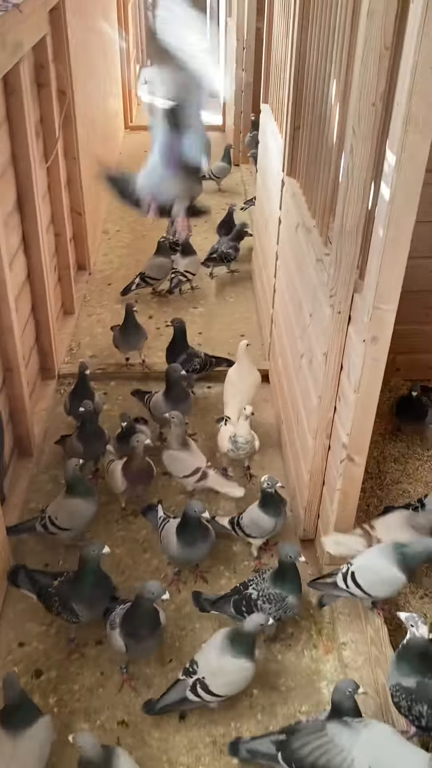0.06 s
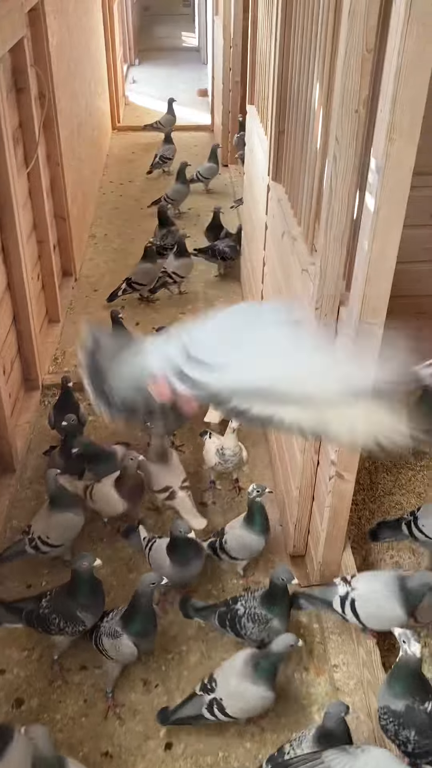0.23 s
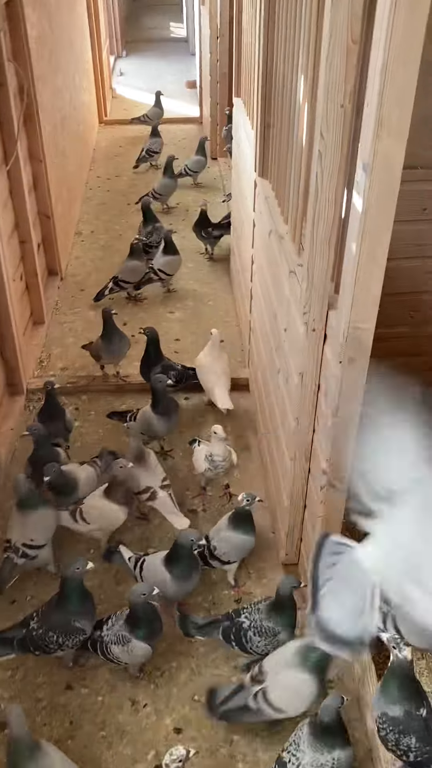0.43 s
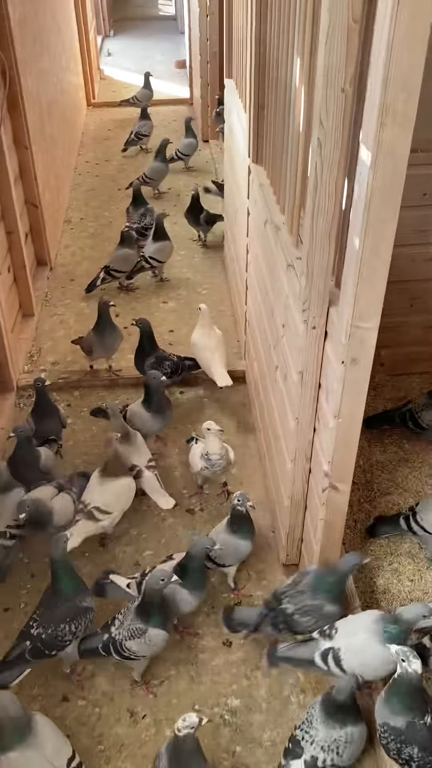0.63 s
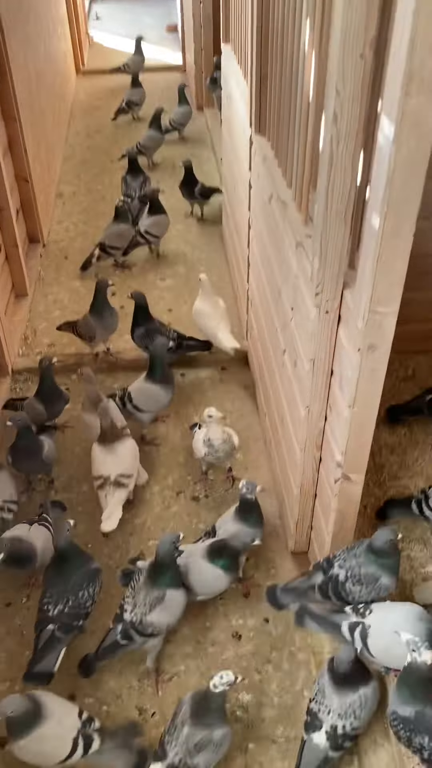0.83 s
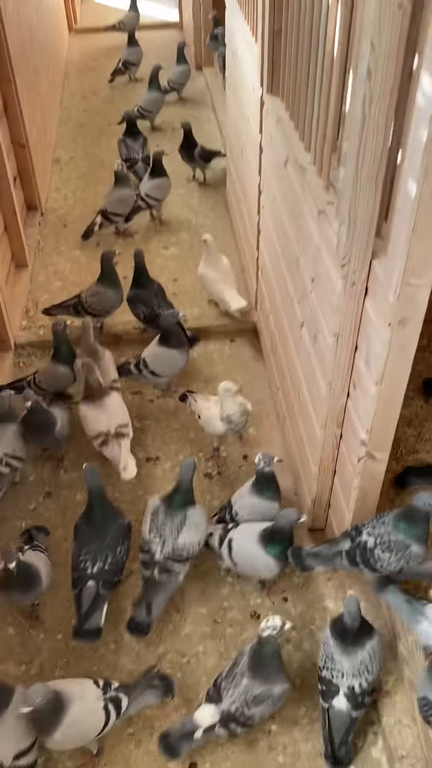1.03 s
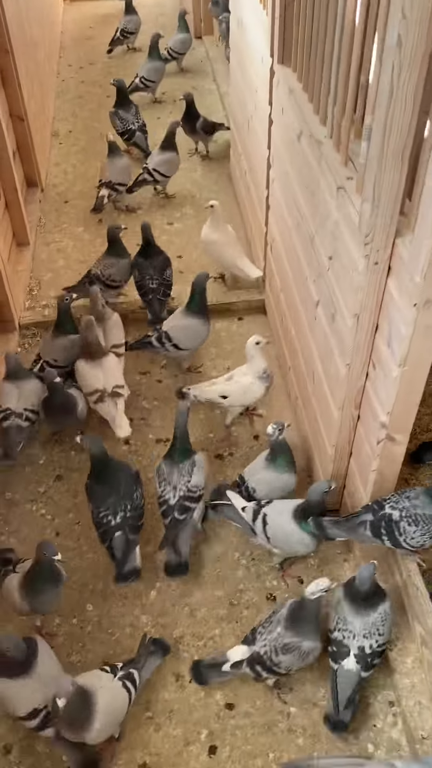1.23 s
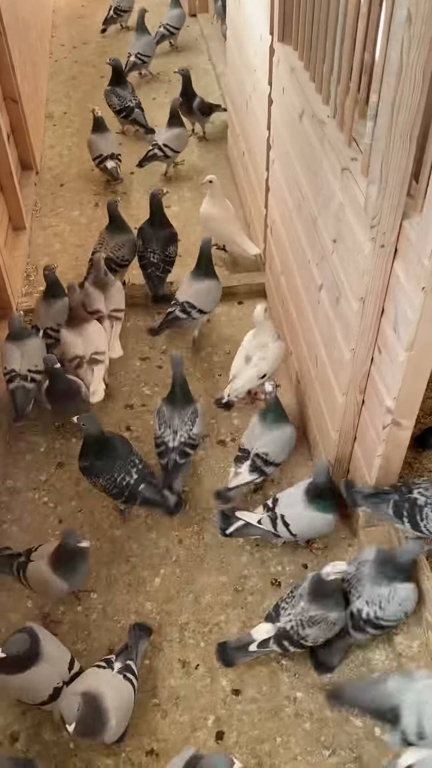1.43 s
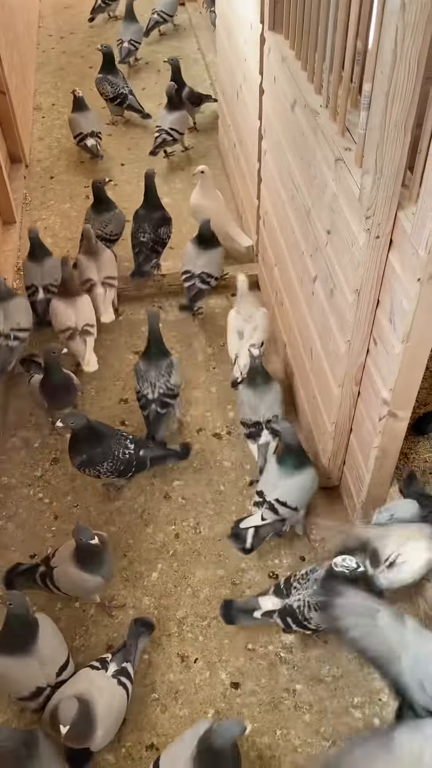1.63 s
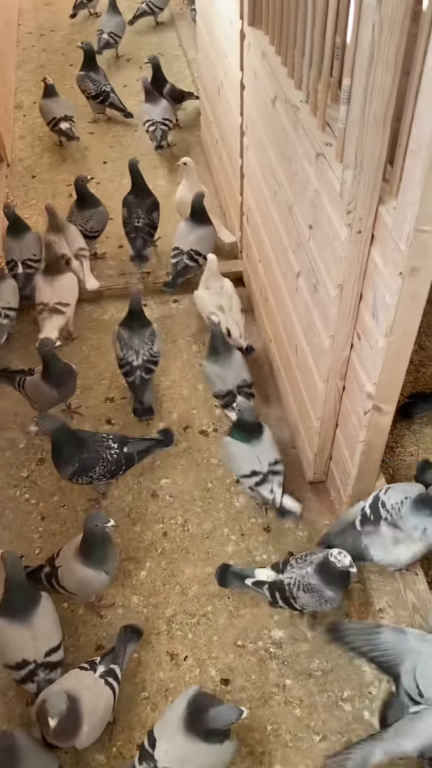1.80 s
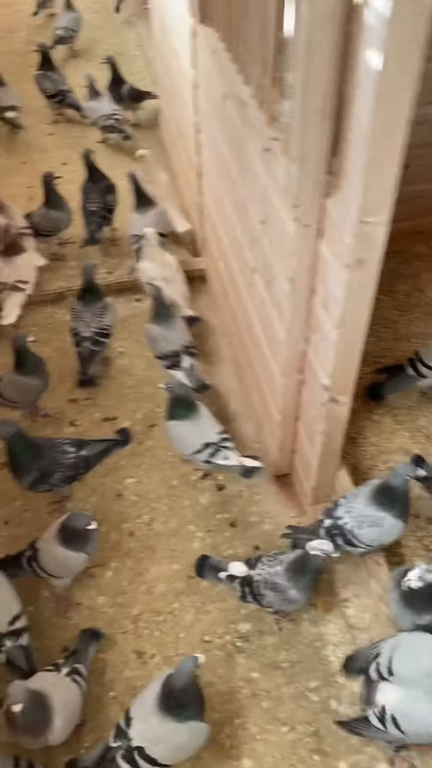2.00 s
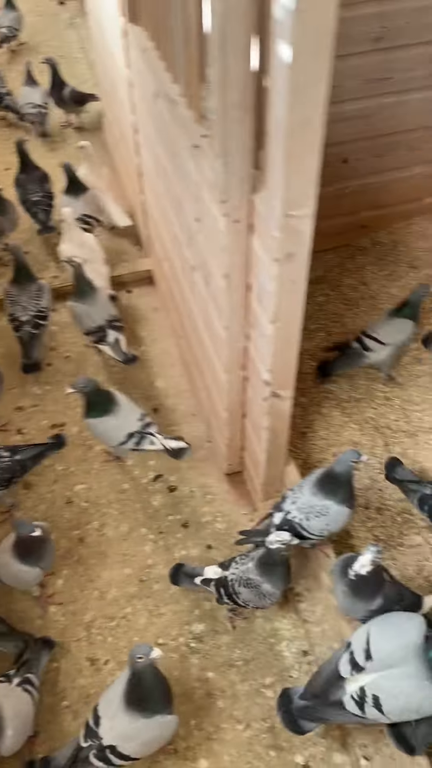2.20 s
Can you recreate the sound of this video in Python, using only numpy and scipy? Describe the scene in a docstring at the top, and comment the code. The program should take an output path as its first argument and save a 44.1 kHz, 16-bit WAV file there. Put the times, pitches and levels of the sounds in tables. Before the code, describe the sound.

Pigeon wings beat quickly at first with a brief high hiss on the right, then thin out among patter, sharp clicks and soft thumps; close stereo microphones in a short, dry plank room.

```python
"""Pigeons in a narrow wooden loft

Uneven wing strokes are puffs of coloured noise; claws and grit snap (wide noise) and tick (short modes).
Bodies thump on the boards as gliding low sines, and a high banded hiss leans right near the start.
Behind them boards boom and feathers rustle in shaped noise, with patter and rung plank modes.
Scattered echoes follow strokes, snaps, ticks and hiss."""
import sys
import numpy as np
from scipy import signal
from scipy.fft import rfft, irfft
from scipy.io import wavfile
from scipy.ndimage import uniform_filter1d, map_coordinates

SR = 44100
rng = np.random.default_rng(int(sys.argv[2]) if len(sys.argv) > 2 else 0)


def log_audio(samples):
    """Write samples as a 16-bit WAV file to the path given in sys.argv[1]."""
    # one column per channel
    frames = np.atleast_2d(samples).T
    # limit to full scale, then quantise
    limited = np.clip(frames, -1, 1)
    pcm = np.round(limited * 32767).astype(np.int16)
    wavfile.write(sys.argv[1], SR, pcm)


def amplitude_ratio(level_db):
    """Convert a level in decibels to the matching linear amplitude (field) ratio."""
    exponent = np.asarray(level_db, float) / 20
    return 10 ** exponent


N = 99445


def evened(x):
    """Scales to rms 1."""
    return x / np.sqrt(np.mean(x ** 2) + 1e-20)


def smooth_noise(count, width):
    """Slow random curve of rms 1: white noise under a moving average."""
    return evened(uniform_filter1d(rng.standard_normal(count), size=width))


def read(points, hz, axis=1):
    """Interpolates one column of a table on a log-frequency axis."""
    table = np.array(points, float)
    return np.interp(np.log(hz + 1), np.log(table[:, 0] + 1), table[:, axis])


def colour(x, gain):
    """Filters by a gain given as a function of frequency."""
    return irfft(rfft(x) * gain(np.fft.rfftfreq(x.shape[-1], 1 / SR)), x.shape[-1])


def bell(hz, centre_hz, octaves):
    """Gaussian hump on a log-frequency axis."""
    return np.exp(-(np.log2((hz + 1) / centre_hz) / octaves) ** 2)


def add(mix, start_s, sound):
    """Lays a two-channel sound into the mix."""
    part = mix[:, round(start_s * SR):][:, :sound.shape[1]]
    part += sound[:, :part.shape[1]]


def play(table, source):
    """Sounds every row of a table at its start time."""
    mix = np.zeros((2, N))
    for start_s, *row in table:
        add(mix, start_s, source(*row))
    return mix


# Each row: start in seconds, level in dB, length in seconds, tilt in dB per octave, hump in Hz.
WING_STROKES = [(.0, -38, 0.023, -6, 1100), (.068, -26.5, 0.023, -3.5, 1710), (.1, -37, 0.038, -5.5, 700),
                (.193, -37.5, 0.013, -7.5, 800), (.224, -35, 0.021, -6, 760), (.333, -35.5, 0.046, -7, 990),
                (.465, -37.5, 0.012, -11, 1000), (.512, -43.5, 0.013, -4, 810), (.558, -38, 0.016, -6, 740),
                (.584, -35.5, 0.012, -8, 720), (.693, -35, 0.023, -2, 990), (.725, -35.5, 0.0094, -11, 900),
                (.905, -44, 0.017, -8, 840), (1.075, -39.5, 0.012, -5.5, 1490),
                (1.121, -36, 0.016, -11, 1100), (1.149, -38, 0.02, -21, 950),
                (1.23, -44, 0.037, -4.5, 1000), (1.258, -41, 0.019, -6.5, 1450),
                (1.277, -48, 0.0098, -13, 1000), (1.455, -35, 0.019, -10, 700),
                (1.55, -38, 0.033, 0.5, 900), (1.572, -40.5, 0.039, -9, 900), (1.61, -43, .02, -9, 800),
                (1.65, -41, 0.033, -5, 700), (1.703, -47, 0.013, -8, 1200), (1.94, -38.5, 0.03, -17, 596),
                (2.03, -38, 0.014, -15, 900), (2.099, -35, 0.018, -6, 700)]


def wing_strokes():
    """Wings push puffs of air at uneven intervals."""
    return play(WING_STROKES, stroke)


STROKE_RISE_S, STROKE_LOW_HZ, QUILL_DB = 0.0047, 497, 1.5
STROKE_HUMP_DB, STROKE_HUMP_OCTAVES = 4.5, 0.5


def stroke(level_db, length_s, tilt_db_per_octave, hump_hz):
    """A puff of air with a broad hump in its colour and quills brushing unevenly through it."""
    t = np.arange(6000) / SR

    def gain(hz):
        tilt_db = tilt_db_per_octave * np.log2(hz / 1000 + 0.013)
        hump_db = STROKE_HUMP_DB * bell(hz, hump_hz, STROKE_HUMP_OCTAVES)
        return amplitude_ratio(tilt_db + hump_db) / (1 + (STROKE_LOW_HZ / (hz + 1)) ** 4)

    air = evened(colour(rng.standard_normal((2, len(t))), gain))
    shape = np.minimum(t / STROKE_RISE_S, 1) * np.exp(-(t / length_s) ** 2)
    quills_db = QUILL_DB * smooth_noise(len(t), 90)
    return air * shape * amplitude_ratio(level_db + quills_db)


# Each row: start in seconds, level in dB, centre in Hz, t60 in seconds.
FEATHER_CLAW_SNAPS = [(.0695, -34, 4030, 0.04), (.286, -37, 6860, 0.029), (.3601, -34.5, 8000, 0.039),
                      (.4085, -32, 4900, 0.029), (.549, -44, 4200, 0.025), (.7045, -24.5, 9000, 0.031),
                      (.7806, -40, 8000, 0.061), (.887, -41, 5500, 0.047), (.905, -31.5, 7550, 0.061),
                      (.966, -38, 6000, 0.046), (1.075, -38.5, 6000, 0.063), (1.151, -38, 6000, 0.033),
                      (1.335, -33.5, 6160, 0.038), (1.545, -38.5, 5270, 0.13), (1.706, -39.5, 9100, 0.043),
                      (1.833, -29, 7000, 0.026), (1.861, -37, 5040, 0.051), (1.9038, -37.5, 6930, 0.059),
                      (1.9384, -47, 6940, 0.041), (2.0995, -28, 9000, 0.035)]


def snaps():
    """Feathers and claws snap, wide in pitch and short."""
    return play(FEATHER_CLAW_SNAPS, snap)


SNAP_OCTAVES, SNAP_RISE_S, SNAP_GRAIN_DB = 1.7, 0.0031, 5


def snap(level_db, centre_hz, t60_s):
    """A short burst of wide, grainy noise with an exponential decay."""
    t = np.arange(2048) / SR
    air = rng.standard_normal((2, len(t)))
    air = evened(colour(air, lambda hz: bell(hz, centre_hz, SNAP_OCTAVES)))
    grain_db = SNAP_GRAIN_DB * smooth_noise(len(t), 40)
    return air * amplitude_ratio(level_db + grain_db - 60 * t / t60_s) * np.minimum(t / SNAP_RISE_S, 1)


# Each row: start in seconds, level in dB, pitch in Hz, t60 in seconds, offset of the side modes in dB.
CLAW_TICKS = [(.549, -15, 3950, 0.0062, -20), (.59, -31, 3650, 0.007, -14),
              (1.3165, -20, 4500, 0.0056, -15), (1.371, -28.5, 2570, 0.0071, -2),
              (1.4515, -15.5, 2326, 0.016, -12), (1.8125, -27, 3900, 0.0082, -19),
              (1.834, -28, 3850, 0.011, -16), (2.153, -22.5, 3350, 0.0094, -2.5),
              (2.165, -31, 3410, 0.026, -14)]


def ticks():
    """Claws or beaks tick on wood and grit."""
    return play(CLAW_TICKS, tick)


TICK_SCRATCH_DB, TICK_SIDE_DB, TICK_RISE_S = -11.5, -5, 0.0016
# Each row: multiple of the pitch, level in dB.
TICK_SIDE_MODES = [(.62, -4.5), (1.47, 5), (1.98, -3)]


def tick(level_db, pitch_hz, t60_s, others_db):
    """A few short modes of a small hard thing, higher ones dying sooner, with a scratch of noise."""
    t = np.arange(3000) / SR
    phase = rng.random((2, 1)) * 2 * np.pi
    modes = [(1, 0)] + [(k, db + others_db) for k, db in TICK_SIDE_MODES]
    ring = np.zeros((2, len(t)))
    for k, mode_db in modes:
        decay = amplitude_ratio(mode_db - 60 * t * np.sqrt(k) / t60_s)
        ring += decay * np.sin(2 * np.pi * pitch_hz * k * t + phase)
    ring *= amplitude_ratio([[0], [TICK_SIDE_DB]])
    scratch = amplitude_ratio(TICK_SCRATCH_DB - 60 * t / t60_s) * rng.standard_normal((2, len(t)))
    return (ring + scratch) * amplitude_ratio(level_db) * np.minimum(t / TICK_RISE_S, 1)


# Each row: start in seconds, level in dB, pitch in Hz, length in seconds.
BOARD_THUMPS = [(.0, -27.5, 134, 0.021), (.1, -30, 339, 0.041), (.15, -30, 78.6, .05),
                (.22, -29.5, 264, 0.018), (.345, -29.5, 55, 0.052), (.47, -34.5, 55, 0.043),
                (.595, -31.5, 52, 0.042), (.715, -33, 109, .03), (1.11, -35.5, 350, 0.024),
                (1.485, -28.5, 145, 0.033), (1.49, -33, 260, .04), (1.505, -22.5, 125, 0.041),
                (1.535, -29.5, 184, 0.065), (1.575, -26.5, 88, .03), (1.6, -34, 340, .03),
                (1.605, -28.5, 73, 0.036), (1.645, -30, 110, 0.055), (1.68, -33, 160, .05),
                (1.86, -34, 155, 0.037), (1.915, -31.5, 62, 0.06), (1.955, -26, 189, 0.034),
                (2.155, -25, 210, 0.032), (2.225, -31, 380, .025), (2.227, -25, 175, 0.03)]


def thumps():
    """Feet and bodies land on the boards."""
    return play(BOARD_THUMPS, thump)


THUMP_GLIDE, THUMP_WOBBLE = 0.12, 0.05  # shares of the pitch: total rise, rms


def thump(level_db, pitch_hz, length_s):
    """A board swings unevenly, swelling and dying under a half-sine."""
    t = np.arange(4096) / SR
    noise = uniform_filter1d(rng.standard_normal(len(t)), size=150)
    wobble = evened(uniform_filter1d(noise, size=150))
    part = np.minimum(t / length_s, 1)
    pitch = pitch_hz * (1 + THUMP_GLIDE * (part - 0.5) + THUMP_WOBBLE * wobble)
    turns = np.cumsum(pitch) / SR + rng.random()
    return np.ones((2, 1)) * amplitude_ratio(level_db) * np.sin(np.pi * part) * np.sin(2 * np.pi * turns)


HISS_FROM_S, HISS_TO_S, HISS_DB, HISS_FADE_DB = 0.022, 0.25, -39, -6
HISS_ROUGH_DB, HISS_SIDE_DB = 2.5, -8
HISS_SAG = 0.0152  # bands start this share high and end this share low
# Each row: centre in Hz, half width in Hz, level in dB.
HISS_BANDS = [(3850, 380, -1), (4420, 270, -0.5), (5660, 360, -5)]


def hiss():
    """Noise in narrow high bands that sink a little, throbbing, from the right."""
    t, length_s = np.arange(SR // 2) / SR, HISS_TO_S - HISS_FROM_S

    def gain(hz):
        return sum(amplitude_ratio(db) * np.exp(-((hz - centre) / width) ** 4) for centre, width, db in HISS_BANDS)

    air = colour(rng.standard_normal((2, len(t))), gain)
    slowed_s = t * (1 + HISS_SAG) - HISS_SAG * t ** 2 / length_s
    air = evened(np.array([map_coordinates(a, [slowed_s * SR], order=3) for a in air]))
    rough_db = HISS_ROUGH_DB * smooth_noise(len(t), 200)
    edge = np.clip(np.minimum(t / 0.0031, (length_s - t) / 0.019), 0, 1)
    air *= edge * amplitude_ratio(HISS_DB + HISS_FADE_DB * t / length_s + rough_db)
    return np.array([air[0], amplitude_ratio(HISS_SIDE_DB) * air[1] - 0.71 * air[0]])


ROOM_T60_S, ROOM_DB, TICK_ROOM_DB = 0.098, -6.5, -9.5


def loft(x):
    """Scattered echoes off the close plank walls, random in sign and decaying."""
    at = np.arange(100, 12000, 20) + rng.integers(0, 20, (2, 595))
    echoes = rng.choice([-1., 1.], at.shape) * amplitude_ratio(-60 * at / SR / ROOM_T60_S)
    taps = np.zeros((2, 12100))
    np.put_along_axis(taps, at, echoes, 1)
    return signal.fftconvolve(x, taps / np.linalg.norm(taps[0]), axes=1)[:, :N]


def impacts(per_s, spread_db):
    """Random impulses in two channels at shared instants, a few of them large."""
    size = amplitude_ratio(spread_db * np.minimum(rng.exponential(1, N), 4)) * (rng.random(N) < per_s / SR)
    return size * rng.standard_normal((2, N))


STEPS_PER_S, STEPS_SPREAD_DB = 220, 2.5
# Each row: pitch in Hz, level in dB, t60 in seconds.
PLANK_MODES = [(266.5, -7, 0.17), (346, 6, .1), (405, -6, 0.11), (533.5, 2, 0.059), (668, -2, 0.24),
               (813, -6, 0.1), (990, -7.5, 0.06), (1430, -13, 0.068), (1655, -8.5, 0.09)]


def steps():
    """Light feet tap the planks, ringing each mode in three copies slightly off its pitch."""
    out, t = np.zeros((2, N)), np.arange(4096) / SR
    for hz, db, t60_s in PLANK_MODES * 3:
        hits = impacts(STEPS_PER_S / len(PLANK_MODES) / 3, STEPS_SPREAD_DB)
        swing = np.sin(2 * np.pi * hz * rng.uniform(0.939, 1.08) * t)
        ring = amplitude_ratio(db - 60 * t / t60_s) * swing * np.minimum(t / 0.0013, 1)
        out += signal.oaconvolve(hits, ring[None], axes=1)[:, :N]
    return evened(out)


PATTER_PER_S, PATTER_SPREAD_DB = 500, 2
# Each row: frequency in Hz, relative level in dB per Hz.
RUSTLE_SPECTRUM = [(200, -18), (450, -1), (800, -3.5), (1400, -8.5), (2000, -11), (3000, -11),
                   (4200, -10.5), (6500, -12), (10000, -29), (14500, -15), (16200, -32)]


def patter():
    """Small steps and crackles: sparse grains of many pitches, a few of them large."""
    out, t = np.zeros((2, N)), np.arange(256) / SR
    for hz in np.geomspace(500, 14000, num=24):
        hits = impacts(PATTER_PER_S / 24, PATTER_SPREAD_DB)
        grain = np.sin(2 * np.pi * hz * t) * hz * t * np.exp(-hz * t / 0.72)
        grain *= amplitude_ratio(read(RUSTLE_SPECTRUM, hz)) * hz
        out += signal.oaconvolve(hits, grain[None], axes=1)[:, :N]
    return evened(out)


def wash(spectrum, patch_db, flicker_db, size):
    """Two unrelated noises that share drifting patches and flicker."""
    hop = size // 4
    frames, hz = N // hop + 5, np.fft.rfftfreq(size, 1 / SR)
    a, b, c, d, patches = rng.standard_normal((frames, len(hz), 5)).T
    patches = uniform_filter1d(patches, size=6, axis=0)
    patches = evened(uniform_filter1d(patches, size=10, axis=1))
    flicker = smooth_noise(frames, 14)
    level_db = read(spectrum, hz)[:, None] + patch_db * patches + flicker_db * flicker
    z = np.array([a + 1j * b, c + 1j * d]) * amplitude_ratio(level_db)
    return evened(signal.istft(z, nperseg=size, noverlap=size - hop)[1][:, :N])


BOOM_PATCH_DB, RUSTLE_PATCH_DB, FLICKER_DB, DEEP_HZ = 0.5, 3, 1.5, 60
PATTER_DB, STEPS_DB = -12, -3.5  # against the rustle
# Each row: frequency in Hz, relative level in dB per Hz.
BOOM_SPECTRUM = [(25, -32), (45, -10), (70, -1), (125, 1), (200, -3), (300, -9.5), (420, -10.5),
                 (700, -24.5), (1200, -53.5)]
# Each row: time in seconds, floor boom in dB, feather rustle in dB, gain of the deepest boom in dB.
FLOCK_BUSTLE = [(0.0, -34, -45.5, 7.5), (.28, -34, -42, -1), (0.53, -36.5, -43.5, 8), (0.71, -37, -45, 3),
                (0.94, -39, -45, -3), (1.18, -37.5, -45, -8), (1.4, -38.5, -44.5, -5),
                (1.53, -36, -43.5, -3), (1.79, -38.5, -46.5, 4), (2.0, -35.5, -47.5, -1),
                (2.25, -37.5, -46, -10)]


def flock():
    """The steady boom of the boards and rustle of feathers follow the bustle."""
    s, boom_db, rustle_db, deep_db = np.transpose(FLOCK_BUSTLE)
    t = np.arange(N) / SR
    boom = wash(BOOM_SPECTRUM, BOOM_PATCH_DB, 0, size=1024)
    deep = colour(boom, lambda hz: 1 / (1 + (hz / DEEP_HZ) ** 4))
    boom = boom - deep + amplitude_ratio(np.interp(t, s, deep_db)) * deep
    rustle = wash(RUSTLE_SPECTRUM, RUSTLE_PATCH_DB, FLICKER_DB, size=256)
    rustle += amplitude_ratio(PATTER_DB) * patter() + amplitude_ratio(STEPS_DB) * steps()
    return amplitude_ratio(np.interp(t, s, boom_db)) * boom + amplitude_ratio(np.interp(t, s, rustle_db)) * rustle


def scene():
    """Two channels: what the microphones share and what sets them apart."""
    near = wing_strokes() + snaps()
    add(near, HISS_FROM_S, hiss())
    close = ticks()
    echoes = loft(amplitude_ratio(ROOM_DB) * near + amplitude_ratio(TICK_ROOM_DB) * close)
    return near + close + echoes + thumps() + flock()


# Each row: frequency in Hz, sum in dB, difference in dB, share of the sum leaning left.
MICROPHONE_PAIR = [(30, 1.5, -37, 0.15), (70, 0.5, -61, -0.052), (143, 0, -18, 0.15), (292, 1, -18.5, 0.13),
                   (590, 0, -1.5, 0.35), (1100, 2, -0.5, 0.58), (2150, 0.5, 0.5, -0.059),
                   (4500, -0.5, 2.5, -0.046), (6510, -4, -1.5, 0.18), (7470, -7.5, 3.5, -0.051),
                   (8920, -17, 6.5, 0), (10800, -29, 6.5, 0), (11970, -10, 3, 0), (15200, 0.5, -5, 0),
                   (15800, -11.5, -19, 0)]


def microphone_pair(x):
    """Forms left and right: the sum dips near 10 kHz, the difference lacks bass."""
    both = colour(x[0], lambda hz: amplitude_ratio(read(MICROPHONE_PAIR, hz)))
    apart = colour(x[1], lambda hz: amplitude_ratio(read(MICROPHONE_PAIR, hz, axis=2)))
    apart += colour(both, lambda hz: read(MICROPHONE_PAIR, hz, axis=3))
    return np.array([both + apart, both - apart])


def top_cut(x):
    """Nothing passes above the cut-off."""
    return signal.sosfilt(signal.butter(12, 16130, fs=SR, output="sos"), x)


def record(dry):
    """Cuts the top above 16050 Hz and takes the scene with the microphone pair."""
    limited = colour(dry, lambda hz: hz < 16050)
    mix = microphone_pair(limited)
    return top_cut(mix)


dry = scene()
out = record(dry)
log_audio(out)
```